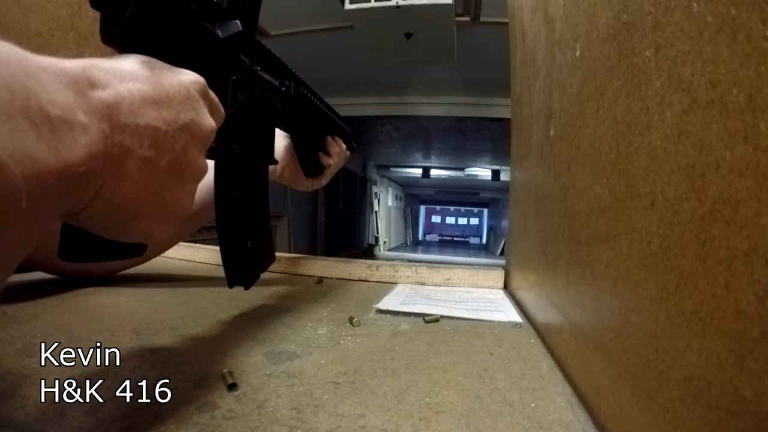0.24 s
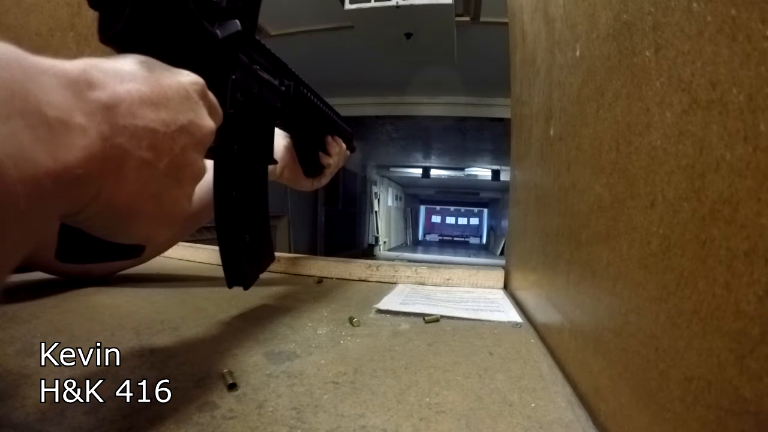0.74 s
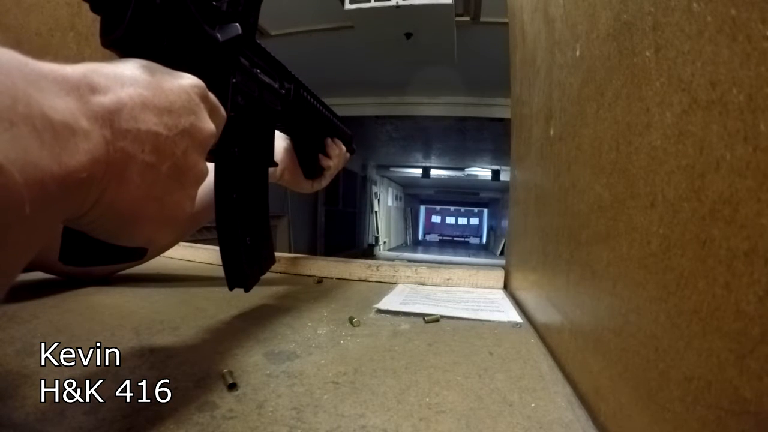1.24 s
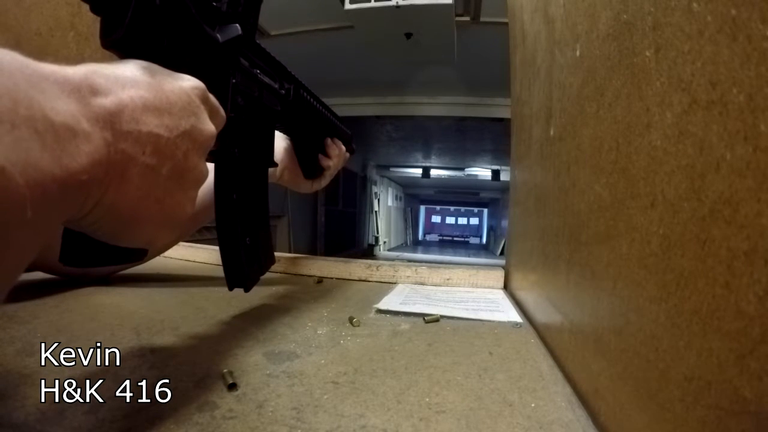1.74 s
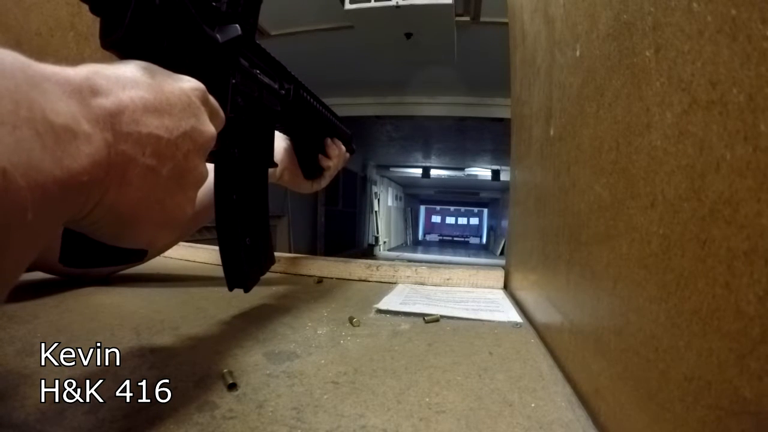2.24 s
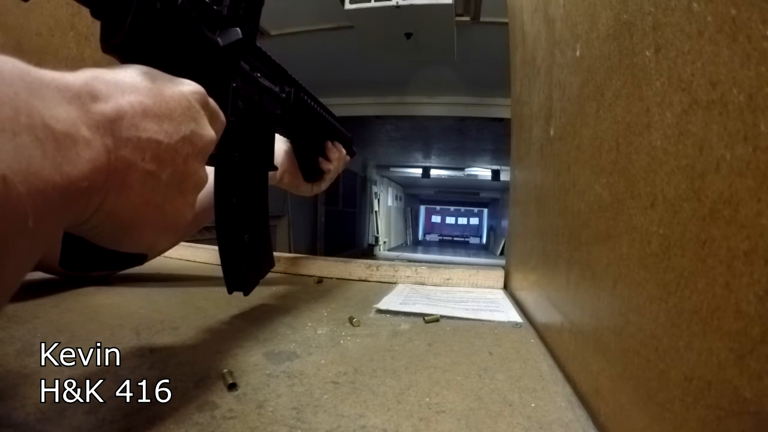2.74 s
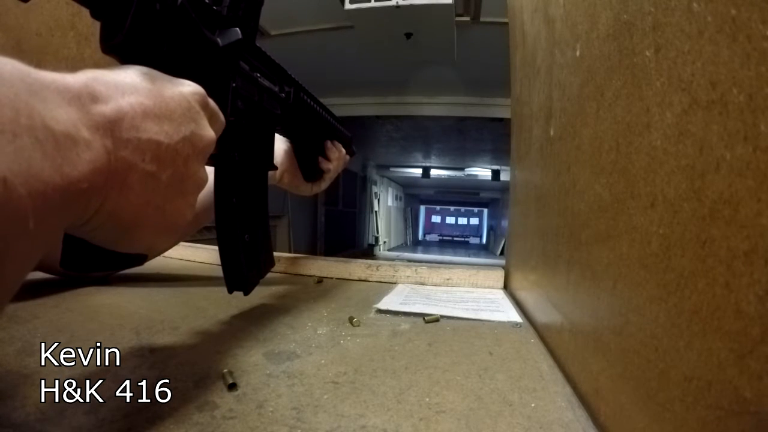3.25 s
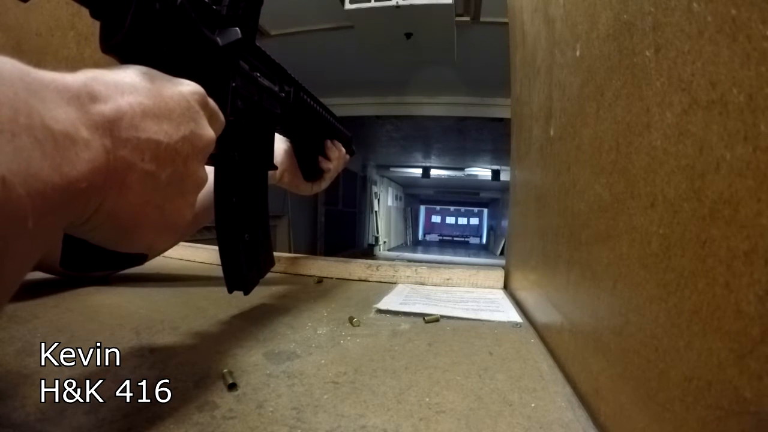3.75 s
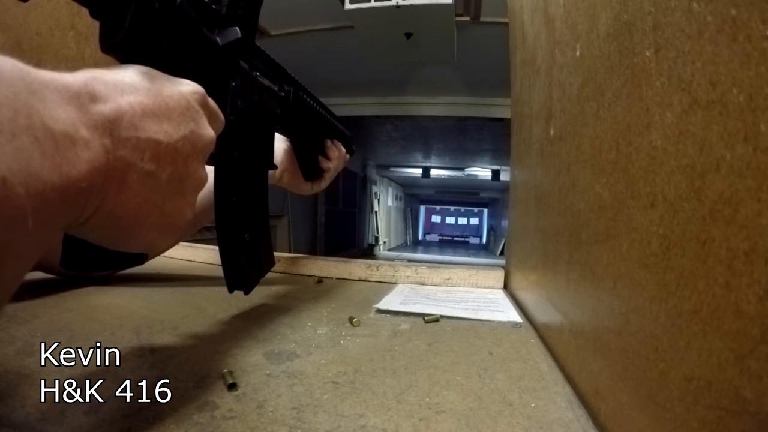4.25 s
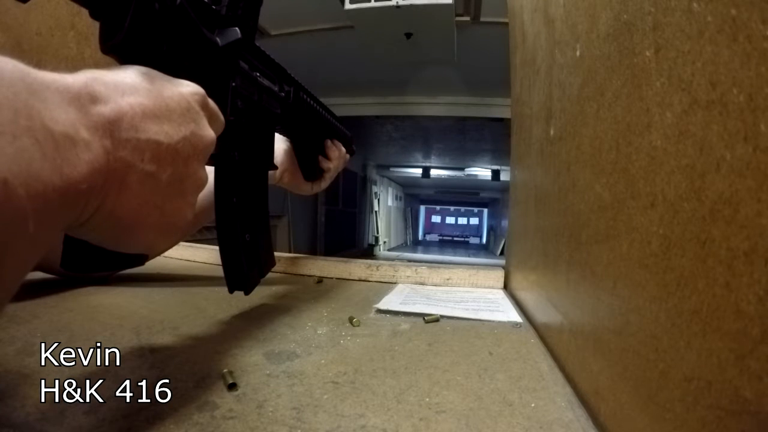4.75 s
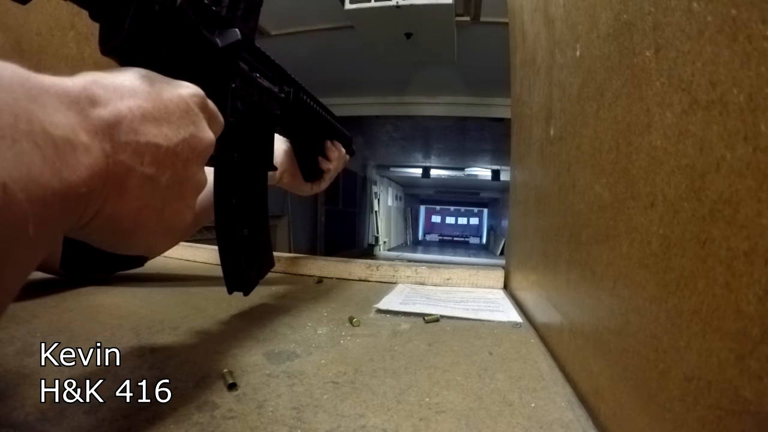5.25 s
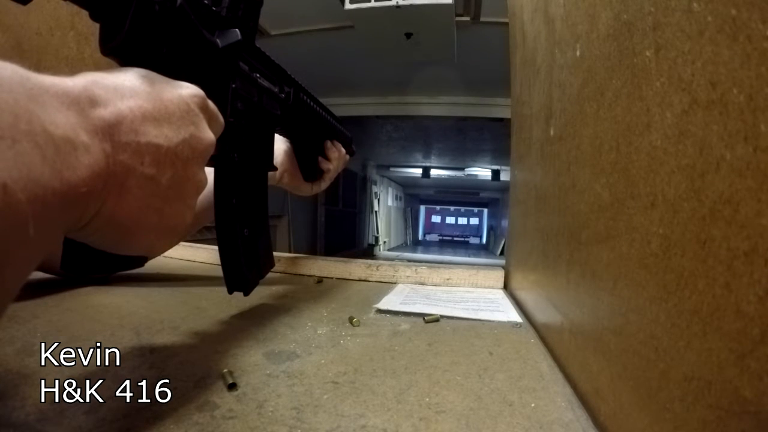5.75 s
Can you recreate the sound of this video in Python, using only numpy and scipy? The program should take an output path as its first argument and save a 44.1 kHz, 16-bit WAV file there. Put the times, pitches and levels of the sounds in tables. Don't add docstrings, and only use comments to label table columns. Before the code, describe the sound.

The stretch opens inside the fading echo of an earlier rifle shot. At about 0.12 s a blast from another lane arrives as a blurred cluster of cracks. At 0.7 s the near rifle fires: a hard, bright crack, quick reflections, a bolt slam and a low floor thump. Another far, bright blast follows at 1.25 s, then a louder near shot at 2.38 s with a boxy board boom. A duller, heavy far shot comes at 3.55 s. Faint scuffing around 4.6 s precedes the last near shot at 4.84 s, with the deepest boom. After every shot a dense concrete reverberation rolls on, darkening until the next blast. Small cases tick near 2.0, 3.1, 3.45, 4.6 and 5.95 s, mostly buried. Steady ventilation and low rumble lie underneath. The small cased microphone is close, coloured and resonant; its limiter ducks just before loud blasts, which saturate.

```python
import sys
import numpy as np
from scipy import signal
from scipy.fft import rfft, irfft
from scipy.io import wavfile
from scipy.ndimage import uniform_filter1d

SR = 44100
rng = np.random.default_rng(int(sys.argv[2]) if len(sys.argv) > 2 else 0)


def pcm_store(signal):
    levels = np.round(np.clip(np.atleast_2d(signal), -1, 1) * 32767)
    wavfile.write(sys.argv[1], SR, levels.astype(np.int16).T)


def gain_from_decibels(decibels):
    exponent = np.asarray(decibels, float) / 20
    return 10 ** exponent


N = 264314


def evened(x):
    return x / np.sqrt(np.mean(x ** 2) + 1e-20)


def read(points, hz):
    f, value = np.transpose(points)
    return np.interp(np.log(hz + 1), np.log(f + 1), value)


def add(mix, s, sound):
    part = mix[round(s * SR):][:len(sound)]
    part += sound[:len(part)]


# (frequency [Hz], width [Hz], level [dB])
CASING = [(1369, 93, 8.5), (1832, 230, 4.5), (2535, 320, 5), (3610, 600, 7), (10330, 1200, 4),
          (5600, 200, 5.5), (6880, 380, 6.5)]


def casing_db(hz):
    return sum(db / (1 + (2 * (hz - f) / width) ** 2) for f, width, db in CASING)


# (frequency [Hz], density [dB per Hz])
HALL = [(40, -39), (70, -10), (170, -31.5), (225, -0.5), (300, -13.5), (450, -8.5), (800, -13), (1200, -12),
        (1750, -6.5), (4000, -8.5), (4230, -13.5), (7700, -19), (8500, -23), (15500, -32.5)]


def colour_db(hz):
    return read(HALL, hz) + casing_db(hz)


def octaves_up(hz):
    return np.log2(np.maximum(hz, 4000) / 4000)


# (frequency [Hz], density [dB per Hz])
AIR = [(25, -13.5), (90, -9.5), (150, -18), (228, -6.5), (486, -8.5), (800, -24.5), (1360, -19.5),
       (3700, -32.5), (4600, -31), (7500, -37), (8800, -42), (15300, -48.5)]
AIR_DB, RUMBLE_DB = -54.5, -71.5
# (time [s], level [dB], rise [s], fall [s])
SWELLS = [
    (.78, -50.5, .15, 0.16),
    (1.85, -60.5, .25, .4),
    (2.48, -52, .3, 0.13),
    (3.48, -58, .12, .2),
    (4.6, -56.5, 0.24, .3),
    (4.92, -45.5, 0.12, 0.18),
    (5.99, -58, 0.25, .1),
]


def ventilation():
    hz = np.fft.rfftfreq(N, 1 / SR)
    t = np.arange(N) / SR
    air_gain = gain_from_decibels(read(AIR, hz) + casing_db(hz))
    air = evened(irfft(rfft(rng.standard_normal(N)) * air_gain, N))
    rumble_gain = 1 / (1 + (abs(hz - 42) / 16) ** 4)
    rumble = evened(irfft(rfft(rng.standard_normal(N)) * rumble_gain, N))
    swell = np.zeros(N)
    for s, db, rise_s, fall_s in SWELLS:
        swell += gain_from_decibels(db) * np.exp(-((t - s) / np.where(t < s, rise_s, fall_s)) ** 2)
    return gain_from_decibels(AIR_DB) * air + (gain_from_decibels(RUMBLE_DB) + swell) * rumble


# (time [s], level [dB])
HANDLING = [
    (4.45, -62.5),
    (4.562, -62),
    (4.6, -47),
    (4.638, -60),
    (4.66, -47),
    (4.73, -63),
    (4.77, -33),
]


def add_handling(mix):
    s, level_db = np.transpose(HANDLING)
    t = np.arange(s[0], s[-1], 1 / SR)
    band = signal.butter(2, [80., 250.], "band", fs=SR, output="sos")
    scuff = evened(signal.sosfilt(band, rng.standard_normal(len(t))))
    add(mix, s[0], scuff * gain_from_decibels(np.interp(t, s, level_db)) * signal.windows.tukey(len(t), .2))


# (frequency [Hz], width [Hz], level [dB])
SHELL = (3700, 390, 6)
RISE_S = 0.0011


def burst(seconds, tilt_db, t60):
    hz = abs(np.fft.fftfreq(4096, 1 / SR))
    shell_hz, shell_width, shell_db = SHELL
    ring_db = shell_db / (1 + (2 * (hz - shell_hz) / shell_width) ** 2)
    gain_db = colour_db(hz) + ring_db + tilt_db * octaves_up(hz)
    log_gain = np.log(gain_from_decibels(np.maximum(gain_db, -100)))
    phase = -signal.hilbert(log_gain).imag
    taps = np.fft.ifft(np.exp(log_gain + 1j * phase)).real[:2048]
    t = np.arange(round(seconds * SR)) / SR
    puff = rng.standard_normal(len(t)) * gain_from_decibels(-60 * t / t60) * np.minimum(t / RISE_S, 1) ** 2
    return signal.oaconvolve(puff, taps / np.linalg.norm(taps))


# (time [s], level [dB], brightness [dB per octave], t60 [s])
TICKS = [
    (2.019, -57, 4, .35),
    (3.082, -46.5, 4, 0.34),
    (3.452, -47.5, 6, 0.52),
    (4.375, -58, 6, .2),
    (4.579, -45.5, -1.5, 0.33),
    (5.565, -60, 6, 0.25),
    (5.949, -54.5, -13, 0.56),
    (5.984, -47.5, -2, .3),
]


def add_ticks(mix):
    for s, db, tilt_db, t60 in TICKS:
        add(mix, s, gain_from_decibels(db) * burst(.3, tilt_db, t60))


# (time [s], level [dB], frequency [Hz], t60 [s])
KNOCKS = [
    (.716, -28.5, 330, 0.25),
    (1.6, -27.5, 447.1, 0.052),
    (2.386, -20.5, 322, 0.2),
    (3.084, -47, 7650, .03),
    (3.8, -51, 250, 0.027),
    (4.642, -51, 298, 0.023),
    (4.66, -45, 899, 0.041),
    (4.845, -18, 303, 0.14),
    (5.81, -82, 11380, .5),
    (5.959, -45.5, 484, 0.15),
]


def add_knocks(mix):
    t = np.arange(9000) / SR
    for s, db, hz, t60 in KNOCKS:
        add(mix, s, gain_from_decibels(db - 60 * t / t60) * np.sin(2 * np.pi * hz * t))


# (frequency [Hz], t60 [s], readiness [dB])
BOOTH = [
    (35, 0.058, -11.5),
    (70.6, 0.5, -2),
    (110, 0.67, -10),
    (150, 0.23, 2.9),
    (221, 0.34, -0.4),
]


def boom(db, centre_hz, fall_db):
    t = np.arange(SR) / SR
    detune = rng.uniform(1.04, 1.1, len(BOOTH))
    total = np.zeros(SR)
    for (hz, t60, ready_db), ratio in zip(BOOTH, detune):
        mode_db = db + ready_db - fall_db * abs(np.log2(hz / centre_hz))
        pair = np.sin(2 * np.pi * hz * t) + 0.26 * np.sin(2 * np.pi * hz * ratio * t)
        total += gain_from_decibels(mode_db - 60 * t / t60) * pair
    return total * np.sin(np.pi / 2 * np.minimum(t / .006, 1)) ** 2


# (time [s], level [dB], favoured frequency [Hz], fall away from it [dB per octave])
BOOMS = [(.001, -35.5, 221, 3.5), (0.117, -16, 121, 47), (0.692, -25, 221, 1.5), (1.243, -26, 150, 24),
         (2.383, -17, 161.5, 5), (2.432, -23.5, 185, 12.5), (3.552, -17, 160, 7.5), (4.766, -14, 110, 66),
         (4.769, -36.5, 221, 40.5), (4.843, -9, 116.7, 19), (4.893, -14.5, 192, 15)]


def add_booms(mix):
    for s, *blow in BOOMS:
        add(mix, s, boom(*blow))


# (time [s], level [dB])
THUMPS = [
    (.694, -8),
    (2.432, -24),
    (4.842, -6),
]


def add_thumps(mix):
    floor_hz, _, floor_ready_db = BOOTH[0]
    for s, db in THUMPS:
        add(mix, s, boom(db - floor_ready_db, floor_hz, 40))


# (time [s], signed height, frequency [Hz])
PUSHES = [
    (0.693, 0.15, 87.6),
    (2.3829, 0.2, 214),
    (3.553, 0.15, 115),
    (4.8413, -0.35, 68.6),
    (4.893, 0.16, 150),
]


def add_pushes(mix):
    t = np.arange(4000) / SR
    for s, height, hz in PUSHES:
        swing = np.sin(2 * np.pi * hz * t) * np.exp(-t * hz * .9)
        add(mix, s, 1.2 * height * swing)


# (frequency [Hz], loss [dB per s])
LOSS = [(50, 30), (150, 40.5), (250, 24.5), (500, -8.5), (1000, -4.5), (2500, -5.5), (5000, 3),
        (8000, 14.5), (11000, 36), (15000, 49)]
TAIL_DB_PER_S, DROOP_DB_PER_S2 = 26, 5
FAR_END_S, FAR_END_SPREAD_S = 0.26, 0.15


def echo(start, end, tail_db, early_db, early_s, return_db, age, tilt_db, bass_db, shell_db):
    t = np.arange(round((end - start) * SR)) / SR
    level_db = (tail_db - TAIL_DB_PER_S * t - DROOP_DB_PER_S2 * t ** 2
                + early_db * np.exp(-t / early_s)
                + return_db * np.exp(-((t - FAR_END_S) / FAR_END_SPREAD_S) ** 2))
    frames = len(t) // 256 + 5
    hz = np.fft.rfftfreq(1024, 1 / SR)
    real, imag, patches = rng.standard_normal((frames, 513, 3)).T
    patches = uniform_filter1d(patches, size=8, axis=0)
    patches = evened(uniform_filter1d(patches, size=8, axis=1))
    shell = shell_db / (1 + ((hz - 3750) / 350) ** 4)
    bass = bass_db / (1 + (hz / 1100) ** 4)
    young_db = colour_db(hz) + shell + tilt_db * octaves_up(hz) + bass
    ages = age + np.arange(frames) * 256 / SR
    gain = gain_from_decibels(young_db[:, None] - read(LOSS, hz)[:, None] * (ages - 0.0383) + 0.9 * patches)
    gain /= np.sqrt((gain[28:105] ** 2).sum(0))
    wash = signal.istft((real + 1j * imag) * gain, nperseg=1024, noverlap=768)[1][:len(t)] / np.sqrt(3)
    clumps = evened(uniform_filter1d(rng.standard_normal(len(t)), size=120))
    clump_db = (0.51 + 4.2 * np.exp(-(t + age) / 0.03)) * clumps
    fade_in = np.clip(t / 0.0096 + (start < .01), 0, 1)
    fade_out = np.clip((t[-1] - t) / 0.008, 0, 1)
    return wash * gain_from_decibels(level_db + clump_db) * np.minimum(fade_in, fade_out)


# (time [s], long tail level [dB], early surplus [dB], surplus fade [s], far-end return [dB])
SHOTS = [
    (0.0, -12, 1, .05, 2.5),
    (.122, -11, 4, 0.067, 2),
    (.697, -11.5, 8.5, 0.025, -1),
    (1.243, -11, 5, 0.069, 2.5),
    (2.385, -13.5, 10.5, 0.053, -2.3),
    (3.567, -11.5, 8.5, 0.068, -0.8),
    (4.848, -10.5, 6, 0.12, -4),
]
# (echo age at start [s], brightness [dB per octave above 4 kHz], bass [dB], shell ring [dB])
LANES = [
    (0.16, -1.7, -6, -6),
    (0.042, -1.5, -3.2, -2),
    (0.0066, -1, 1.1, 2),
    (0.11, 1.4, 3.5, 1),
    (0.011, -1, 2, 0.5),
    (0.04, -3, -2.6, -2.5),
    (0.0099, -2, 0, -0.5),
]


def add_echoes(mix):
    ends = [row[0] + .008 for row in SHOTS[1:]] + [N / SR + .05]
    for (s, *levels), end, lane in zip(SHOTS, ends, LANES):
        add(mix, s, echo(s, end, *levels, *lane))


def add_crack(mix, s, db, tilt_db, ring_ms):
    add(mix, s, gain_from_decibels(db - 6) * burst(.04, tilt_db, 3.3 * ring_ms / 1000))


# (time [s], peak level [dB], brightness [dB per octave], ring [ms])
FAR = [(0.112, -10, -1, 12), (0.122, -5, 8, 6), (.135, -2.5, 3, 10.6), (1.238, 2, 1.5, 7.4),
       (1.243, -3, 2, 9), (1.254, -4, -1.5, 5), (1.2644, -2.5, 3, 11), (1.29, -1, -5, 14),
       (3.5434, -8.5, -8, 15), (3.5485, -5.5, -1, 13), (3.556, -0.5, 2, 10), (3.5643, 9.5, -10, 7.4),
       (3.57, 3, 3, 4.5), (3.579, 1, -6, 3.8), (3.585, -13, -5, 2.7)]


def add_far_shots(mix):
    for crack in FAR:
        add_crack(mix, *crack)


# (time [s], level [dB], brightness [dB per octave], ring factor)
NEAR = [
    (.6934, 6.5, 6, 0.91),
    (2.382, 10, 5.5, 0.79),
    (4.8424, 10, 5, 1.1),
]
# (delay [s], level [dB], brightness [dB per octave], ring [ms])
SEQUENCE = [
    (-.008, -40.5, 0, 14),
    (-.004, -28, -6.5, 9),
    (-.002, -23.5, -6, 6),
    (-.0006, 1, 1, 9.3),
    (.0075, -5.5, -0.5, 8.1),
    (.0145, -12.5, -5, 2.4),
    (0.0239, -8.5, -3.5, 2.5),
    (.031, -12.5, 7.5, 3.5),
    (0.051, -15, -8, 5.3),
]


def add_near_shots(mix):
    for s, db, tilt_db, ring in NEAR:
        for delay_s, step_db, step_tilt_db, ring_ms in SEQUENCE:
            add_crack(mix, s + delay_s, db + step_db, tilt_db + step_tilt_db, ring * ring_ms)


def scene():
    mix = ventilation()
    add_handling(mix)
    add_ticks(mix)
    add_knocks(mix)
    add_booms(mix)
    add_thumps(mix)
    add_pushes(mix)
    add_echoes(mix)
    add_far_shots(mix)
    add_near_shots(mix)
    return mix[None]


def treble_gate(x, under_db):
    edge_hz = 15300
    hz, _, z = signal.stft(x, SR, nperseg=512)
    hz = hz[:, None]
    bands = uniform_filter1d(uniform_filter1d(abs(z) ** 2, size=3, axis=1), size=9, axis=2)
    loudest = bands[:, 12:].max(1, keepdims=True)
    faint = bands < gain_from_decibels(-2 * under_db) * loudest * (hz / 13000) ** 8
    faint = faint & (hz > 11800)
    return signal.istft(z * ~faint * (hz < edge_hz), SR, nperseg=512)[1][:, :N]


def low_pass(x):
    return signal.sosfilt(signal.butter(12, 16470, fs=SR, output="sos"), x)


def record(dry):
    power = uniform_filter1d(np.diff(dry[0], prepend=0) ** 2, size=100)
    coming = uniform_filter1d(1. * (power > .06), size=800, origin=-399) > 1e-6
    begun = uniform_filter1d(1. * (power > .0004), size=600, origin=299) > 1e-6
    duck_db = -12 * uniform_filter1d(1. * coming, size=300, origin=149) * ~begun
    saturated = np.clip(dry * gain_from_decibels(duck_db), -.93, .93)
    thinned = treble_gate(saturated, under_db=50)
    return low_pass(np.clip(thinned, -1, 1))


dry = scene()
out = record(dry)
pcm_store(out)
```